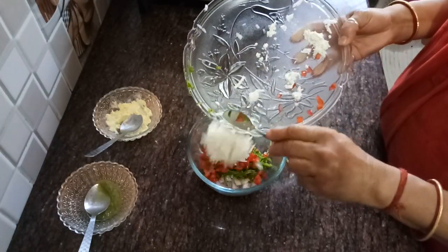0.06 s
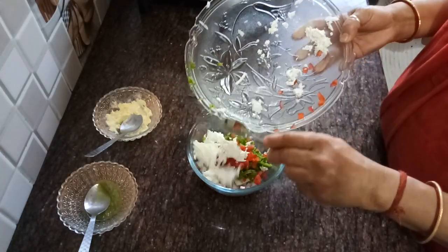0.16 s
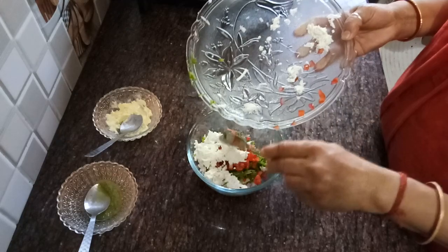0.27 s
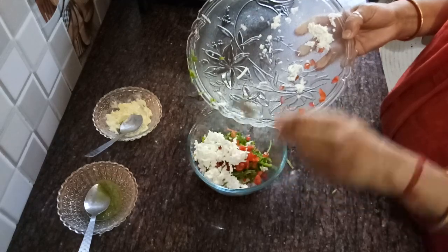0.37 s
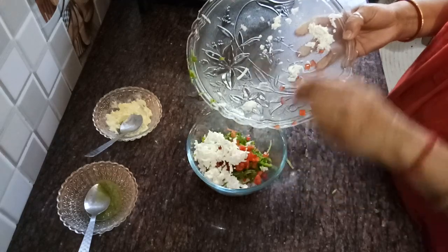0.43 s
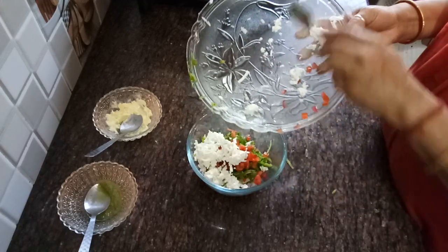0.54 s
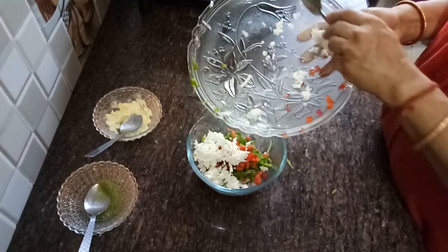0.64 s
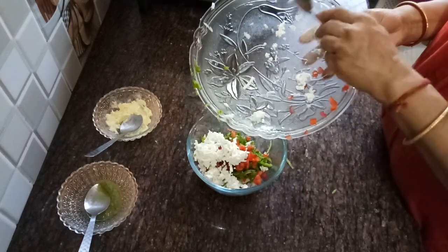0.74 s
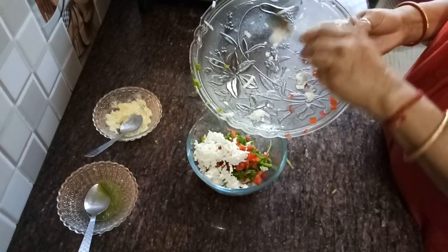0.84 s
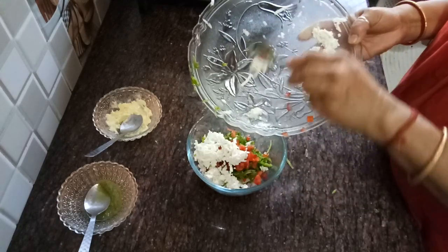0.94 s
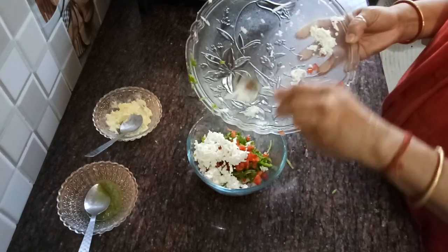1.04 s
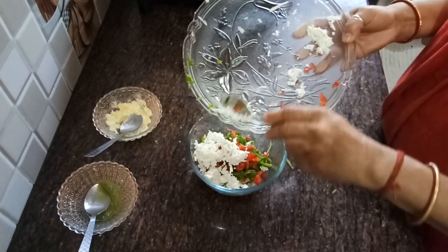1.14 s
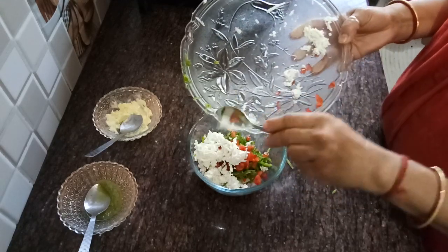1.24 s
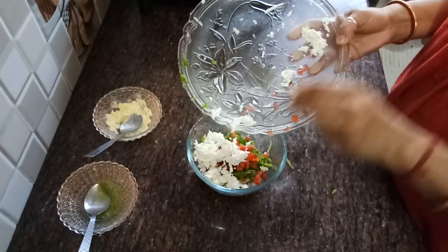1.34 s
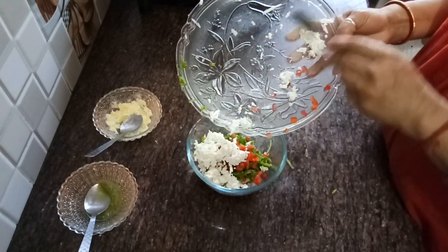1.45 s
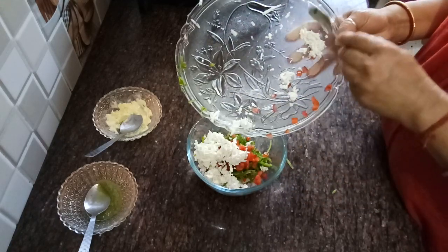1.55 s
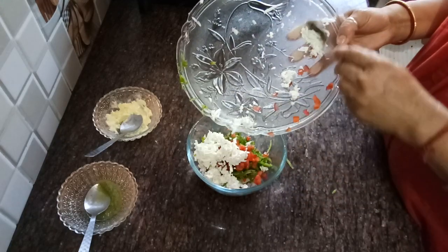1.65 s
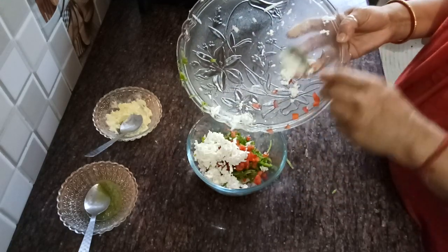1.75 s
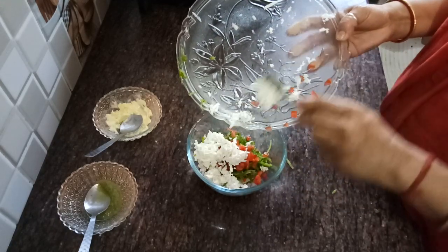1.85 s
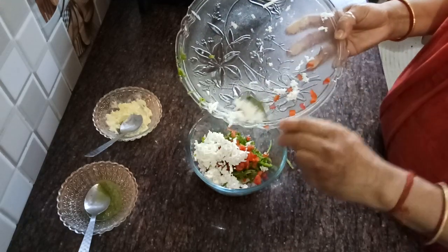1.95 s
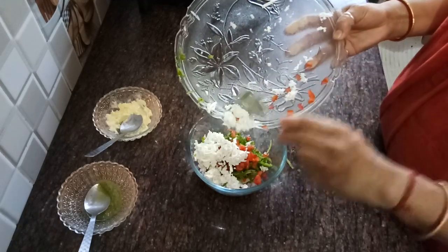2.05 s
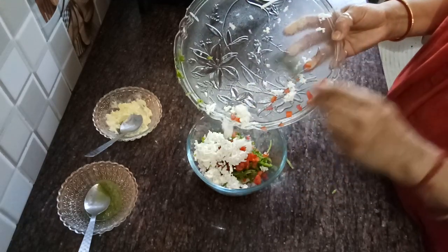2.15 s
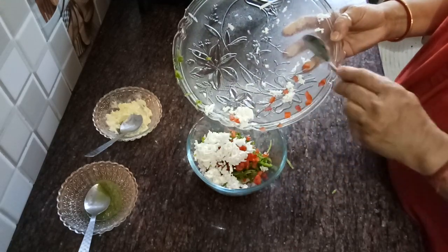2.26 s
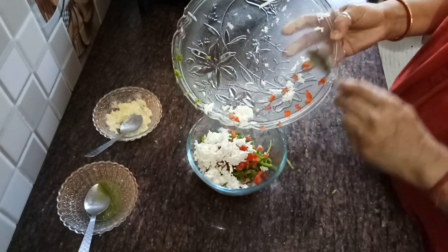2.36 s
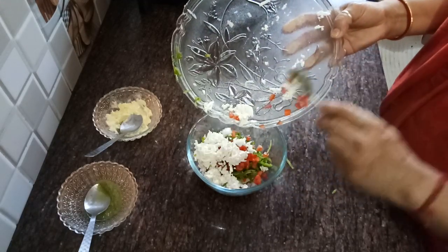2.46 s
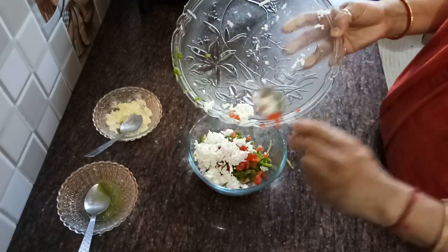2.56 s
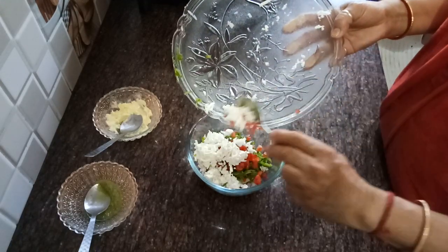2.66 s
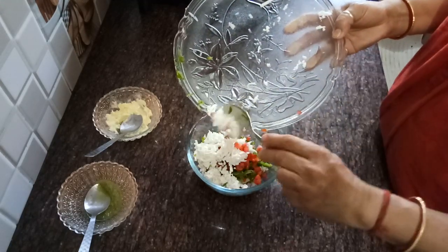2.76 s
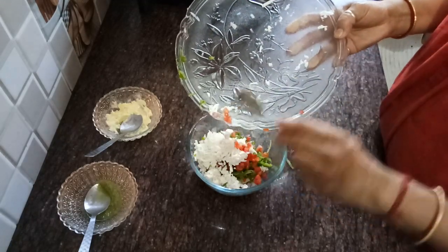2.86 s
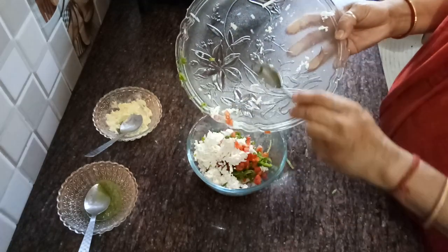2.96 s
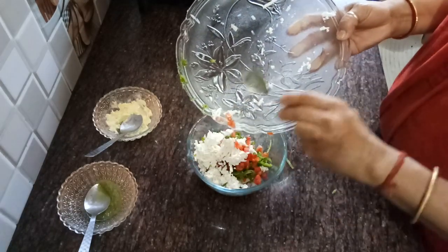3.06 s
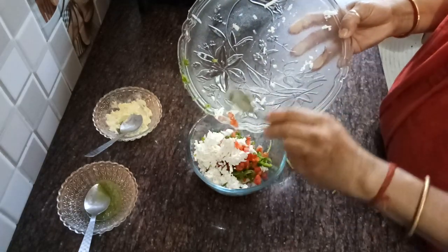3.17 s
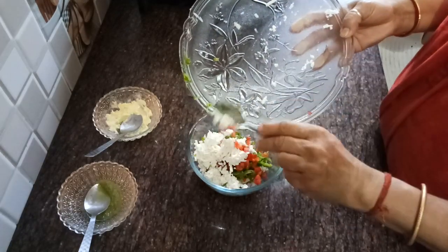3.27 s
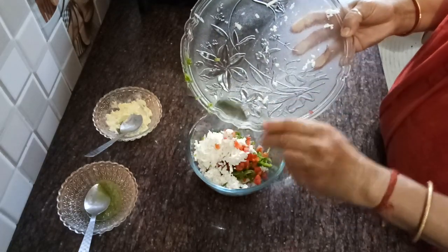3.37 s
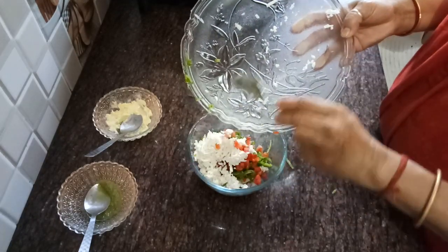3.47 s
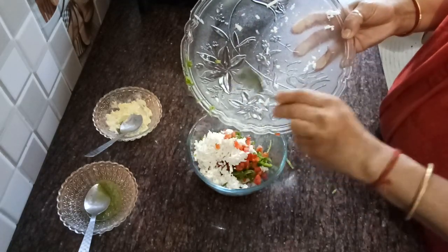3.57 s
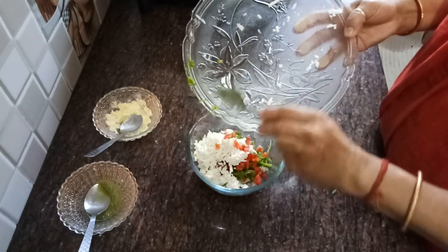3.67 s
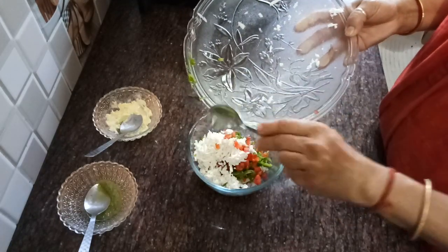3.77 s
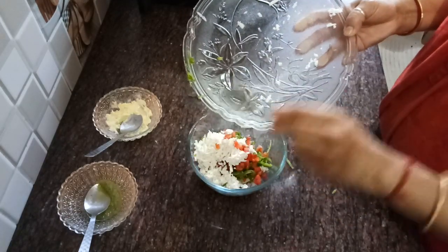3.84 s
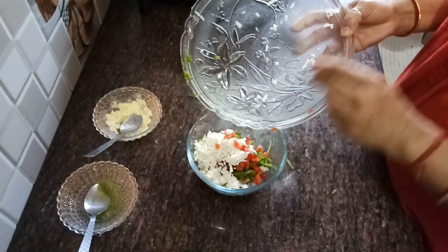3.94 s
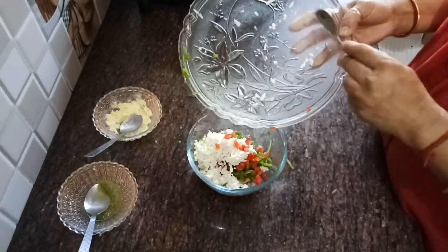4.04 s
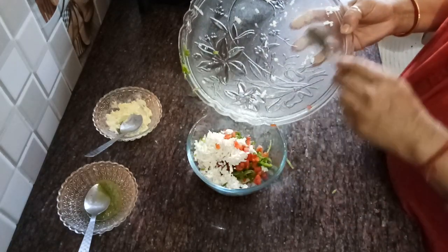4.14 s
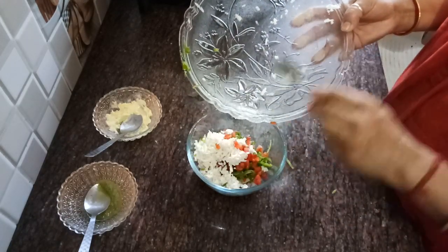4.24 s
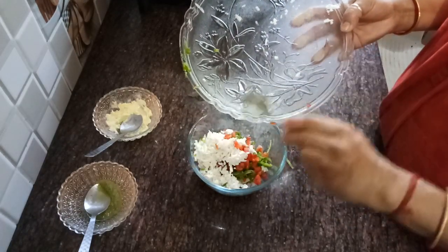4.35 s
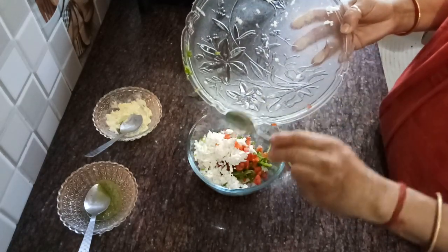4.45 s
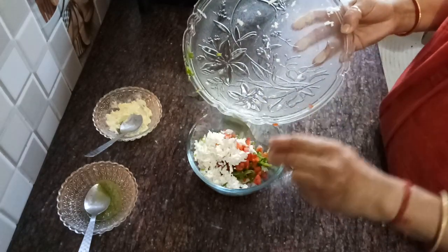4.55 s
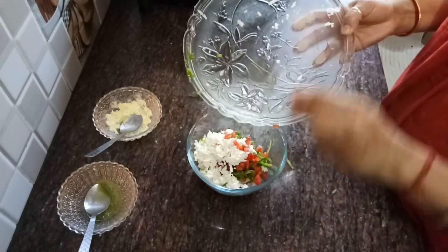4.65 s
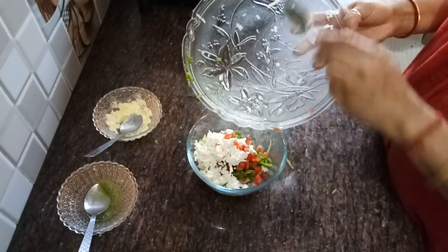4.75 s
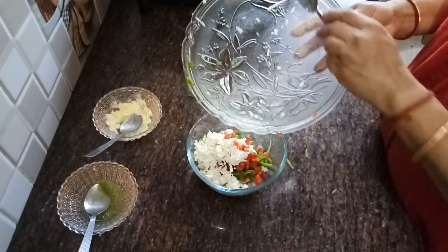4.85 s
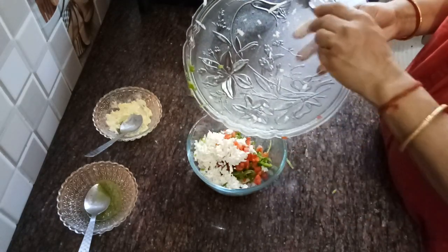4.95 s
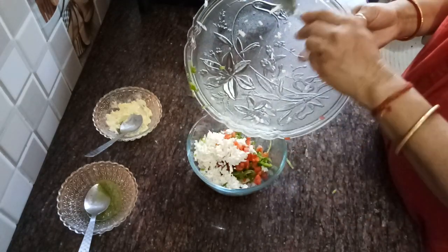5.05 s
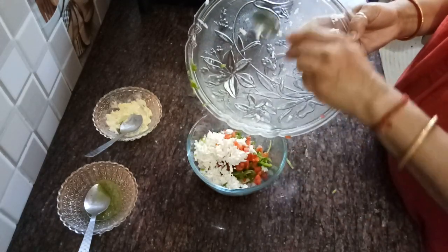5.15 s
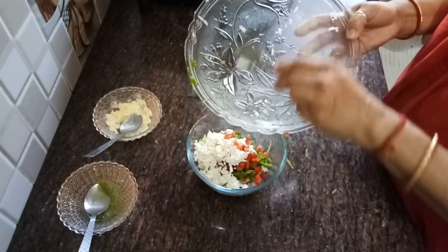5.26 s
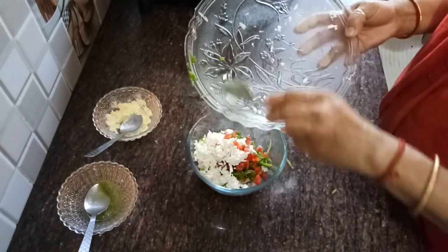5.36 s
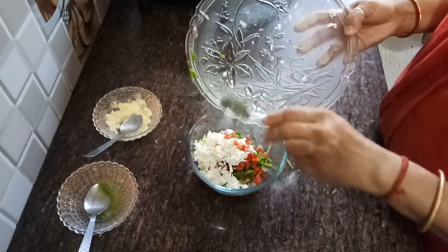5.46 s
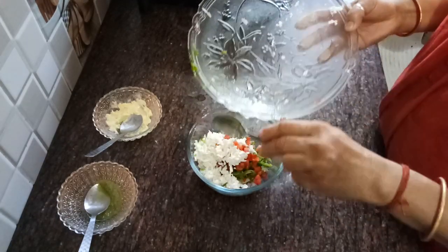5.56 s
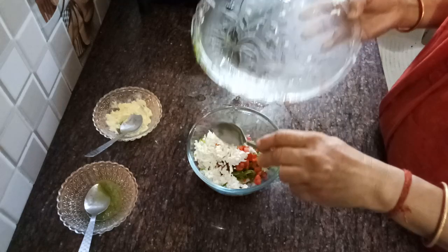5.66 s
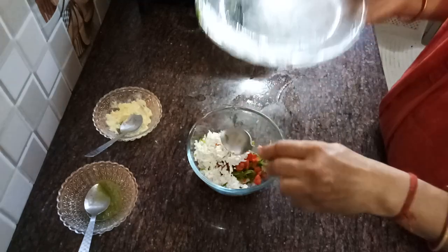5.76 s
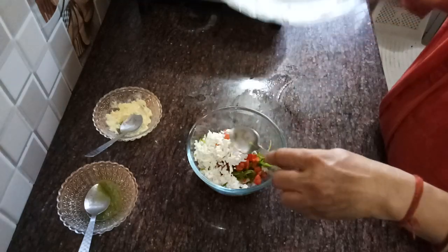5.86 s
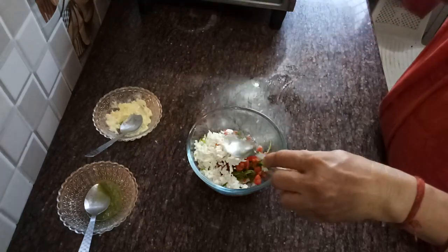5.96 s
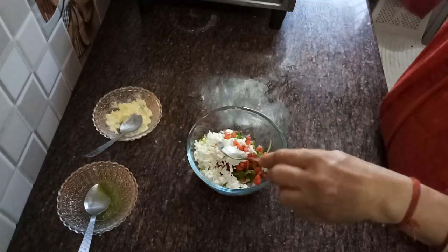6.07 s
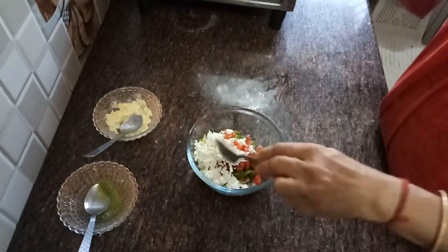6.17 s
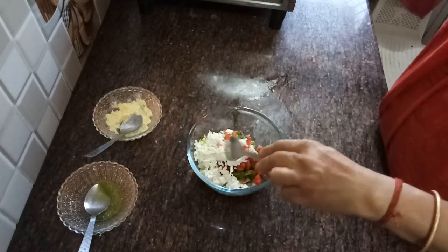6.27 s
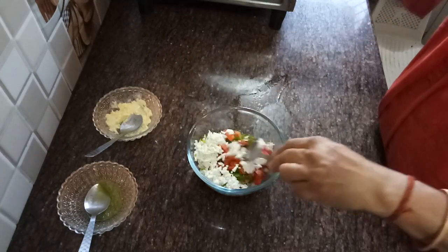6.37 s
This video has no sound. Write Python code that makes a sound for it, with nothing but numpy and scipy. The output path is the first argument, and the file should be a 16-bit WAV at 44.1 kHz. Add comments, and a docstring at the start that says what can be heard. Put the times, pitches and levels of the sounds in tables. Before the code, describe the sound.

Heard close above a kitchen counter, a metal spoon repeatedly taps and scrapes a hand-held glass plate. Sharp, briefly ringing clinks alternate with short gritty slides and lighter glancing knocks, with a quick double clink late on before the strokes turn softer. Chopped vegetables fall into a bowl with occasional muffled thuds. The tiled room adds a short echo over quiet movement rustle and a faint hum.

```python
"""A steel spoon clears chopped vegetables off a hand-held glass plate into a bowl, in a tiled kitchen.
Each contact rings the modes of plate and spoon: a clink on landing, slides and bumps on the
embossed glass, a glancing knock at the rim. Food drops in soft, low noise bursts.
Behind it: rustle of arms and food, room air, a faint appliance hum."""
import sys
import numpy as np
from scipy import signal
from scipy.fft import rfft, irfft, next_fast_len
from scipy.io import wavfile

SR = 44100
rng = np.random.default_rng(int(sys.argv[2]) if len(sys.argv) > 2 else 0)


def transcribe(signal):
    """Save signal, clipped to [-1, 1], as a 16-bit WAV file at the path in sys.argv[1]."""
    frames = np.atleast_2d(signal).T
    limited = np.clip(frames, -1, 1)
    pcm = np.round(limited * 32767).astype(np.int16)
    wavfile.write(sys.argv[1], SR, pcm)


N = 282676
RING_SAMPLES = int(.5 * SR)

# edges of the registers in which plate and spoon ring: (frequency [Hz])
REGISTER_EDGES_HZ = [500, 1000, 1800, 3000, 4500, 6000, 7600, 11000, 16000]


def from_db(db):
    """Decibels to gain."""
    return 10 ** (np.asarray(db) / 20)


def unit_rms(x):
    """Scale to rms 1."""
    return x / np.sqrt(np.mean(x ** 2) + 1e-20)


def unit_onset(x):
    """Scale the first 0.1 s to rms 1."""
    return x / np.sqrt(np.mean(x[:SR // 10] ** 2) + 1e-20)


def at_hz(points, hz):
    """Interpolate a table over log frequency."""
    points_hz, values = np.transpose(points)
    return np.interp(np.log(np.maximum(hz, 1)), np.log(points_hz), values)


def band(x, low_hz, high_hz, order):
    """Causal band-pass."""
    sos = signal.butter(order, [low_hz, min(high_hz, SR / 2 - 1)], "band", fs=SR, output="sos")
    return signal.sosfilt(sos, x + 1e-18)


def noise(spectrum, size):
    """Coloured noise, rms 1."""
    n = next_fast_len(size)
    gain = from_db(at_hz(spectrum, np.fft.rfftfreq(n, 1 / SR)))
    return unit_rms(irfft(rfft(rng.standard_normal(n)) * gain, n)[:size])


def decay(t, t60_s):
    """Exponential decay."""
    return np.exp(-np.log(1000) * t / t60_s)


def add(out, start_s, sound):
    """Mix a sound in at start_s."""
    i = int(start_s * SR)
    out[i:i + len(sound)] += sound[:N - i]


def rustle(trim_db=-2.2):
    """Moving arms and food: noise of drifting level."""
    # envelope: (time [s], level before trim [dB])
    envelope = [(0.0, -62), (0.45, -64), (0.73, -63), (0.82, -61), (1.23, -62), (1.84, -60), (2.77, -60),
                (3.43, -63), (3.8, -60), (5.09, -63), (5.23, -62), (5.89, -62), (6.12, -64), (6.41, -64)]
    # spectrum: (frequency [Hz], relative density [dB])
    spectrum = [(120, -61.5), (200, -37), (303, -11.5), (337, -8.5), (638, -7), (1030, -14.5), (1890, -16),
                (7000, -35.5), (9100, -71.5), (15400, -120)]
    level_db = np.interp(np.arange(N) / SR, *np.transpose(envelope)) + trim_db
    return from_db(level_db) * noise(spectrum, N)


def appliance_hum(hz=100, half_width_hz=12, level_db=-67):
    """Wavering hum: a narrow noise band."""
    hum = band(rng.standard_normal(N + SR), hz - half_width_hz, hz + half_width_hz, order=2)
    return from_db(level_db) * unit_rms(hum[SR:])


def room_air(level_db=-63.3):
    """Steady room noise."""
    # spectrum: (frequency [Hz], relative density [dB])
    spectrum = [(25, -22.5), (50, -16), (70, -24), (100, -15), (190, -16), (400, -4), (800, -8),
                (1400, -15), (2600, -25), (4600, -25.5), (6800, -24.5), (7600, -36.5), (10500, -32),
                (15000, -37.5)]
    return from_db(level_db) * noise(spectrum, N)


def mode_ring(hz, t60_s, t60_scale=.75, pressed_db=7.5, pressed_t60_s=.031):
    """A mode dies fast while the spoon presses on the glass; the rest rings on."""
    t = np.arange(RING_SAMPLES // 2) / SR
    envelope = decay(t, t60_s * t60_scale) + from_db(pressed_db) * decay(t, pressed_t60_s)
    return np.sin(2 * np.pi * hz * t) * envelope


def glass_response(crack_db, scatter_db=3.5, crack_t60_s=.053, grip_detune=.004):
    """One touch: ringing modes, detuned by the grip, plus a crack of dense, fast-damped ones."""
    # plate and spoon modes: (frequency [Hz], relative level [dB], t60 before scaling [s])
    mode_table = [(1265, -3.5, 0.16), (1292, -5.5, 0.3), (1542, -11, .11), (2142, -4.5, 0.17),
                  (2190, -2.5, .24), (2539, -2.5, 0.14), (3473, -3.5, 0.19), (3735, -.5, 0.16),
                  (3864, -15, .12), (5058, -1, 0.23), (5130, -2, 0.13), (5240, -3, 0.18), (6550, -.5, 0.17),
                  (6770, 4, 0.17), (6890, -7.5, 0.099), (7238, -2, 0.15), (7870, -12.5, .12),
                  (8252, -6, 0.18), (9470, -3.5, .16), (8830, 1.5, .18), (9065, -5, 0.17),
                  (8960, 1.5, 0.14), (10098, -2, 0.15), (11300, -8.5, 0.14), (11440, -6, 0.13),
                  (11770, -7.5, 0.11), (12190, -8.5, .14), (14200, -11.5, .13), (14000, -14, .13),
                  (14400, -14, .13)]
    # contact crack: (frequency [Hz], relative density [dB])
    crack_spectrum = [(400, -5.5), (600, -2), (1000, -6.5), (1350, -3.5), (2800, -4.5), (5000, -2),
                      (7000, 1), (7600, -1.5), (9400, 13.5), (10700, -11.5), (11500, -2), (13000, -9),
                      (14300, -8.5), (16000, -22)]
    hz, db, t60_s = np.transpose(mode_table)[:, :, None]
    strength = from_db(db + scatter_db * rng.standard_normal(db.shape))
    polarity = rng.choice([-1, 1], db.shape)
    hz = hz * (1 + grip_detune * rng.uniform(-1, 1, db.shape))
    modes = np.sum(strength * polarity * mode_ring(hz, t60_s), axis=0)
    crack = noise(crack_spectrum, len(modes)) * decay(np.arange(len(modes)) / SR, crack_t60_s)
    return modes + from_db(crack_db) * crack


def kitchen_response(tail_db, early_db=2, early_t60_s=.055, build_s=.016):
    """Direct sound, early echoes off counter and tiles, diffuse tail; drawn anew as the plate moves."""
    # reverberation: (frequency [Hz], t60 [s])
    room_t60 = [(500, 0.33), (2000, 0.36), (5000, 0.32), (9000, 0.27), (15000, 0.26)]
    t = np.arange(RING_SAMPLES) / SR
    early = rng.standard_normal(len(t)) * decay(t, early_t60_s) * (t > .0007)
    early = from_db(early_db) * early / np.linalg.norm(early)
    early[0] = 1   # direct sound
    edges_hz = np.geomspace(300, 17000, 5)
    tail = np.zeros(len(t))
    for low_hz, high_hz in zip(edges_hz, edges_hz[1:]):
        t60_s = at_hz(room_t60, np.sqrt(low_hz * high_hz))
        tail += band(rng.standard_normal(len(t)), low_hz, high_hz, order=2) * decay(t, t60_s)
    tail *= 1 - np.exp(-t / build_s)
    return early + from_db(tail_db) * tail / np.linalg.norm(tail)


def touch_db(tilt_db_oct, clang_db, hz, pivot_hz=4000, flat_below_hz=1300, clang_hz=4800, width_oct=.6):
    """A harder contact is brighter; its angle stresses or damps the clang band."""
    clang_weight = np.exp(-.5 * (np.log2(hz / clang_hz) / width_oct) ** 2)
    return tilt_db_oct * np.log2(max(hz, flat_below_hz) / pivot_hz) + clang_db * clang_weight


def clinks(contacts, colour_db, crack_db, room_db=-1, lead_db=-1, focus_db=3, jolt_db=-13):
    """Each contact rings the glass and favours one lead mode; a glancing one swells more slowly."""
    out, t = np.zeros(N), np.arange(RING_SAMPLES // 2) / SR
    for start_s, level_db, tilt_db_oct, clang_db, contact_ms, lead_hz, wet_db in contacts:
        swell = np.sqrt(np.minimum(1000 * t / contact_ms, 1))
        touch = swell * glass_response(crack_db)
        room = kitchen_response(room_db + wet_db)
        ring = signal.fftconvolve(touch, room)
        lead = signal.fftconvolve(swell * mode_ring(lead_hz, t60_s=.13), room)
        for low_hz, high_hz, register_db in zip(REGISTER_EDGES_HZ, REGISTER_EDGES_HZ[1:], colour_db):
            part = unit_onset(band(ring, low_hz, high_hz, order=4))
            part_db = level_db + register_db + touch_db(tilt_db_oct, clang_db, np.sqrt(low_hz * high_hz))
            if low_hz < lead_hz < high_hz:
                part += from_db(lead_db) * unit_onset(lead)
                part_db += focus_db
            add(out, start_s, from_db(part_db) * unit_onset(part))
        # a blow in the lowest register also jolts the whole plate
        low_db = level_db + colour_db[0] + touch_db(tilt_db_oct, clang_db, REGISTER_EDGES_HZ[0])
        jolt = unit_onset(band(ring, 120, 340, order=1))
        add(out, start_s, from_db(low_db + jolt_db) * jolt)
    return out


def spoon_landings():
    """The tip lands on the plate as a stroke begins."""
    # landings: (time [s], base level [dB], tilt [dB/oct], clang [dB], contact [ms],
    # lead mode [Hz], reverb offset [dB])
    contacts = [(0.689, -36, 2, -2, 3, 5060, -2), (1.6233, -35, -1.4, 2, 3, 3730, .5),
                (2.4139, -31.8, 0, -3.5, 3, 9470, 0), (2.654, -58, -.5, 0, 2, 6555, -5),
                (4.151, -37.3, -.7, 8, 1.5, 7237, 0), (5.0221, -34.6, .3, -6, 2, 8960, -1)]
    # registers, lowest first: (gain [dB])
    colour_db = [-12.5, -2, -5, -.5, 2.5, 0, 5.5, -2]
    return clinks(contacts, colour_db, crack_db=14)


def spoon_slides(slips_per_s=900, spread_db=2.5, tilt_db_oct=-3):
    """The edge slips over the embossed pattern in a stream of tiny touches."""
    # slides: (start [s], end [s], level [dB])
    slides = [(0.842, 0.92, -51), (1.258, 1.316, -62), (1.871, 2.03, -60.5), (2.622, 2.726, -55),
              (3.756, 3.82, -47.5), (4.31, 4.389, -51), (5.183, 5.242, -53.5), (5.416, 5.523, -54)]
    out = np.zeros(N)
    for start_s, end_s, level_db in slides:
        size = int((end_s - start_s) * SR)
        slips = (rng.random(RING_SAMPLES) < slips_per_s / SR) * rng.standard_normal(RING_SAMPLES)
        slips *= from_db(spread_db * rng.standard_normal(RING_SAMPLES))
        force = slips[:size] * signal.windows.tukey(size)
        scrape = signal.fftconvolve(force, glass_response(crack_db=14))
        scrape = signal.fftconvolve(scrape, kitchen_response(tail_db=0))
        # food under the spoon dulls the slide
        n = next_fast_len(len(scrape))
        octaves = np.log2(np.maximum(np.fft.rfftfreq(n, 1 / SR) / REGISTER_EDGES_HZ[1], 1))
        dulled = irfft(rfft(scrape, n) * from_db(tilt_db_oct * octaves), n)
        add(out, start_s, from_db(level_db) * unit_onset(dulled))
    return out


def soft_thuds(edge_ratio=1.35):
    """Food drops, the plate shifts in the hand: one damped, low burst each."""
    # thuds: (time [s], centre [Hz], level of half the peak [dB], t60 [s])
    thuds = [(0.871, 102, -57, 0.4), (.87, 276, -58, .3), (2.17, 325, -49, .16), (2.22, 96, -57.5, 0.25),
             (2.478, 95, -47.5, 0.26), (4.431, 140, -55.5, .08), (5.79, 626, -57, 0.35)]
    out, t = np.zeros(N), np.arange(RING_SAMPLES) / SR
    for start_s, hz, level_db, t60_s in thuds:
        burst = rng.standard_normal(len(t)) * decay(t, t60_s)
        thud = band(burst, hz / edge_ratio, hz * edge_ratio, order=3)
        add(out, start_s, 2 * from_db(level_db) * thud / np.abs(thud).max())
    return out


def spoon_bumps():
    """Mid-stroke the spoon bumps on the embossed glass."""
    # bumps: (time [s], base level [dB], tilt [dB/oct], clang [dB], contact [ms],
    # lead mode [Hz], reverb offset [dB])
    contacts = [(0.954, -35.2, .2, -2, 2, 5055, -.5), (3.099, -34.4, -.2, -1, 3, 2188, -1),
                (3.658, -41.8, 1.8, 2, 6, 5243, -7), (5.2478, -37.2, -2.3, -.5, 3, 2200, -4)]
    # registers, lowest first: (gain [dB])
    colour_db = [-20.5, 1.5, 3.5, -1.5, 5.5, -5.5, 3, -7.5]
    return clinks(contacts, colour_db, crack_db=13.5)


def rim_knocks():
    """The spoon leaves over the rim with a glancing knock."""
    # knocks: (time [s], base level [dB], tilt [dB/oct], clang [dB], contact [ms],
    # lead mode [Hz], reverb offset [dB])
    contacts = [(1.284, -52.6, 0, 3, 20, 3720, -4), (1.803, -54.7, -4.5, 0, 7, 2245, -5.5),
                (2.7287, -35.8, -1.3, 0, 2, 2548, 4), (3.3028, -34.6, 5.3, -3, 3, 5114, -1.5),
                (3.804, -53.8, -2.5, 0, 16, 2516, -6), (4.4283, -33.8, 4.5, 0, 4, 6772, 1.5),
                (4.47, -38.3, .6, 1.5, 11, 6772, 6.5), (5.519, -54.3, -3, 1, 7, 2150, -1)]
    # registers, lowest first: (gain [dB])
    colour_db = [-21, -1.5, 4, 6, 2.5, 2.5, -2, -12.5]
    return clinks(contacts, colour_db, crack_db=12)


def scene():
    """Mono mix, heard from above the counter."""
    spoon = spoon_landings() + spoon_bumps() + rim_knocks() + spoon_slides()
    return (spoon + soft_thuds() + rustle() + appliance_hum() + room_air())[None]


def record(dry):
    """Soft clip, then a steep low-pass."""
    ceiling, cutoff_hz = .4, 15700
    low_pass = signal.ellip(10, .1, 80, cutoff_hz, fs=SR, output="sos")
    return signal.sosfilt(low_pass, ceiling * np.tanh(dry / ceiling))


dry = scene()
out = record(dry)
transcribe(out)
```